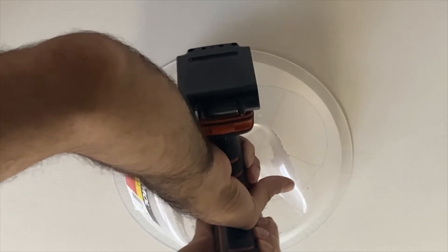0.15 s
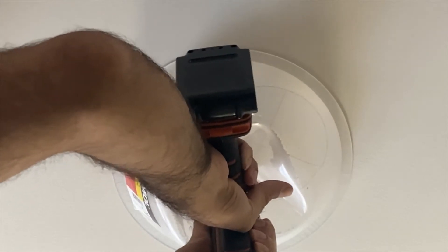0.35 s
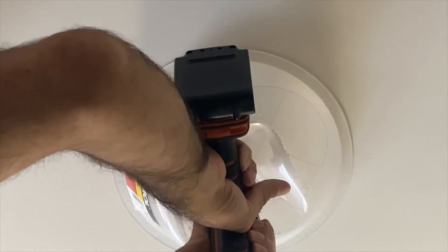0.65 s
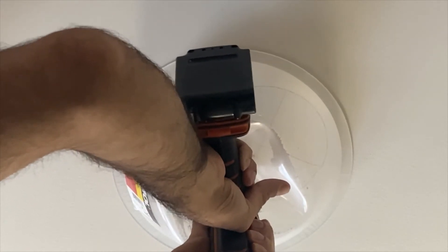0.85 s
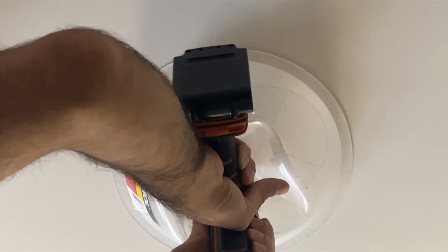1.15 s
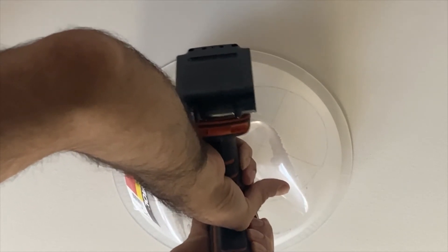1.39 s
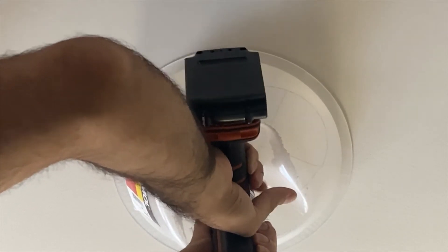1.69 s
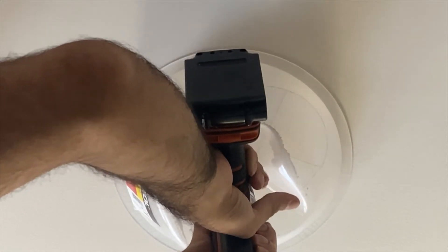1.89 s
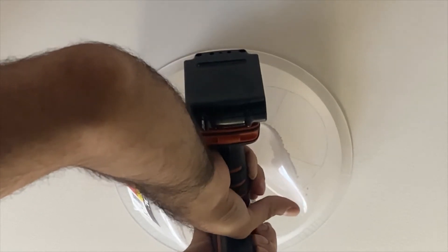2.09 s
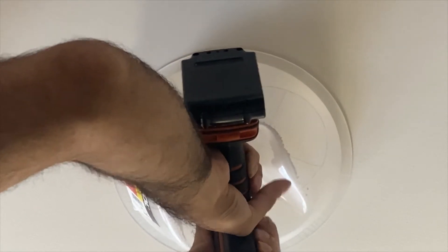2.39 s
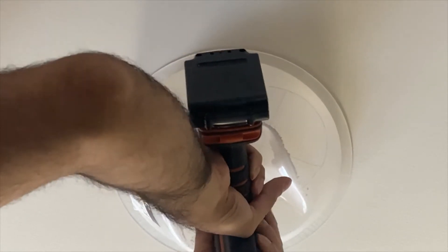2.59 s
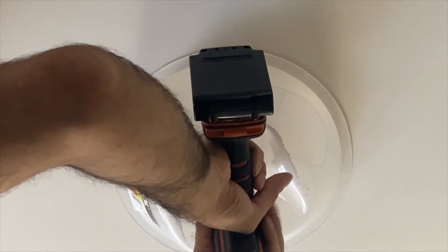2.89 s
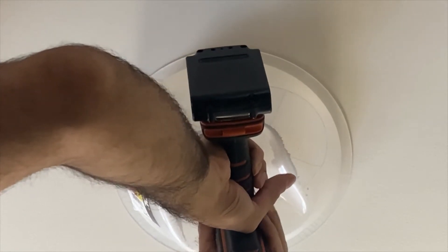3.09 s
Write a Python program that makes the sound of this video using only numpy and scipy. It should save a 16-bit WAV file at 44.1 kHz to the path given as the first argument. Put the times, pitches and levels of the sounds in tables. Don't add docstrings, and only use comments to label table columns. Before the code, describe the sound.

Loud gritty hole-saw drilling in plasterboard, with gear whine and hollow plastic bowl resonance, cuts off suddenly; a short bare-room echo fades to quiet hum, then tiny nudges and a trigger clack, heard on a mono phone.

```python
import sys
import numpy as np
from scipy import signal
from scipy.io import wavfile
from scipy.ndimage import uniform_filter1d

SR = 44100
rng = np.random.default_rng(int(sys.argv[2]) if len(sys.argv) > 2 else 0)


def undo_db(level):
    steps = np.asarray(level, float) / 20
    return 10 ** steps


def inscribe(sig):
    pcm = np.round(np.clip(np.atleast_2d(sig).T, -1, 1) * 32767)
    wavfile.write(sys.argv[1], SR, pcm.astype(np.int16))


N = 143325


def drill():
    # t/s, shaft speed f/Hz, effort level/dB, imbalance level/dB
    run = [(0, 258, -28, 9), (0.058, 215.1, -31.5, 9), (0.122, 197.2, -29.5, 7), (0.168, 282, -26.5, 2),
           (0.229, 362, -26, 3), (.34, 362, -27.5, 2), (.41, 358.6, -27, -6), (0.499, 362.3, -26.5, 6),
           (.65, 365, -26, 2), (.82, 361, -26, 4), (.93, 360, -25.5, 0), (1.051, 359, -25, 5),
           (1.22, 358, -26, 5), (1.29, 362, -26.5, -8), (1.39, 361, -25.5, 6), (1.5, 363, -26, 3),
           (1.57, 363, -26.5, 0)]
    # t/s, level/dB
    thump_swell = [
        (0, 4.5),
        (.4, -6),
        (.9, -10.5),
        (1.15, 4),
        (1.5, 5.5),
    ]
    stop_s, brake_s, brake_drop = 1.58, 0.05, 0.61
    shaft_wobble, room_db, tone_room_db = 0.004, -6, -16
    t = np.arange(N) / SR
    s, hz, db, imbalance_db = np.transpose(run)
    braking = np.clip((t - stop_s) / brake_s, 0, 1)
    speed = np.interp(t, s, hz) * (1 - brake_drop * braking)
    speed = speed * (1 + shaft_wobble * drift(size=1500))
    effort = undo_db(np.interp(t, s, db)) * (1 - braking) ** 2

    thump = undo_db(-28.5 + np.interp(t, *np.transpose(thump_swell))) * whistle(62.7, width_hz=20)
    tones = shaft_tones(speed, undo_db(np.interp(t, s, imbalance_db)))
    near = effort * saw_rasp()
    pitched = effort * (tones + thump) + bowl_booms() + singing()

    far = undo_db(room_db) * near + undo_db(tone_room_db) * pitched
    shift = 2 * np.pi * 1.7 * t
    return near + pitched + room(far * np.cos(shift)) + room(far * np.sin(shift))


def shaft_tones(speed, imbalance):
    # multiple of shaft speed, level/dB, fuzz width f/Hz
    shaft = [
        (1, -22, 18),
        (2.01, -20, 16),
        (5.02, -27, 40),
        (7.53, -24, 40),
        (8.55, -24, 40),
        (9.6, -24, 40),
    ]
    # t/s, level/dB
    second = [(.2, -9), (.254, 8.5), (.3, -6), (.335, 14), (.4, -7), (.5, 2), (.58, 4.5), (.8, 3),
              (.86, -11), (.97, 3), (1.08, -6.5), (1.15, -10.5), (1.27, 0.5), (1.4, -16), (1.47, 8.5),
              (1.55, 9)]
    t = np.arange(N) / SR
    loaded = np.clip((speed - 190) / 30, 0.1, 1)
    gains = [imbalance, loaded * undo_db(np.interp(t, *np.transpose(second)))]
    gains += [loaded] * (len(shaft) - 2)
    out = np.zeros(N)
    for (order, db, width_hz), gain in zip(shaft, gains):
        patchy = undo_db(db + drift(size=1500))
        out += patchy * gain * tone(order * speed, width_hz, fuzz_db=-10)
    return out


def saw_rasp():
    # f/Hz, width f/Hz, level/dB
    body_modes = [(184.3, 51, -24), (687, 330, -24.5), (956, 200, -27), (1327, 93, -24.5), (1797, 840, -13),
                  (2210, 250, -23.5), (3033, 1600, -8.5), (5210, 980, -19.5), (6285, 940, -17.5),
                  (10430, 1300, -23)]
    # f/Hz, level/dB per Hz
    rasp_spectrum = [(53, -48), (90, -18), (438, -1), (606, -15), (721, -5), (1160, -2.5), (3150, -2),
                     (10400, -6.5), (16000, -14.5)]
    grit_per_s, grit_spread_db = 25000, 1.2
    flicker_db, cup_sway_db, cup_turns_hz = -0.36, 0.5, 10.1
    t = np.arange(N) / SR
    cup = np.sin(2 * np.pi * (cup_turns_hz * t + 0.22))
    hit = rng.random(N) < grit_per_s / SR
    size = undo_db(grit_spread_db * np.minimum(rng.exponential(1, N), 3))
    grit = evened(hit * size * rng.standard_normal(N))
    flicker = evened(uniform_filter1d(rng.standard_normal(N), size=700))
    grit = grit * undo_db(flicker_db * flicker + cup_sway_db * cup)

    out = colour(grit, rasp_spectrum, patchy_db=0.5)
    for hz, width_hz, db in body_modes:
        out = out + undo_db(db) * evened(resonate(resonate(grit, hz, width_hz), hz, width_hz))
    return out


def bowl_booms():
    # t/s, f/Hz, level/dB
    booms = [(.27, 452, -32.5), (0.304, 463.7, -37.5), (.368, 425.8, -33.5), (.45, 438.6, -41.5),
             (.53, 465.6, -40.5), (.6, 466.6, -35), (0.711, 463, -36), (.788, 458.3, -34.5),
             (.838, 443.6, -41.5), (0.881, 432.3, -36), (.986, 436, -40), (1.039, 439, -38.5),
             (1.082, 445.7, -33), (1.177, 426, -38), (1.27, 434, -34.5), (1.39, 436, -41.5),
             (1.484, 437.6, -33.5), (1.565, 430, -33)]
    boom_s, rise_hz_per_s = 0.018, 400
    t = np.arange(N) / SR
    s, hz, _ = np.transpose(booms)
    nearest = np.abs(t[::64, None] - s).argmin(1).repeat(64)[:N]
    rise = rise_hz_per_s * np.clip(t - s[nearest], -0.05, 0.05)
    pitch = uniform_filter1d(hz[nearest] + rise, size=300)
    level = sum(undo_db(db) * swell(t, at, boom_s) for at, _, db in booms)
    return level * tone(pitch, width_hz=40, fuzz_db=-10)


def singing():
    # middle t/s, half length t/s, f/Hz, level/dB
    sings = [(.3, .06, 2760, -41), (.55, .07, 2752, -36), (.72, .04, 2745, -36), (.95, .05, 2715, -39),
             (1.03, .04, 2690, -36), (1.15, .06, 2685, -36), (1.42, .04, 2725, -36), (.85, .07, 3092, -36),
             (1.0, .05, 3090, -38), (1.21, .04, 3065, -35), (1.45, .05, 3085, -38), (.68, .04, 3505, -37),
             (.78, .04, 3470, -38), (.94, .04, 3450, -37), (1.42, .04, 3487, -37), (1.52, .05, 3510, -37),
             (.53, .04, 1825, -38), (.92, .04, 1680, -39), (1.31, .03, 2520, -38), (1.44, .05, 1703, -38),
             (.22, .04, 1696, -39), (.2, .05, 2190, -40)]
    out = np.zeros(N)
    fuzz = 1 + undo_db(-5) * whistle(0, width_hz=40)
    for k, (at, half_s, hz, db) in enumerate(sings):
        part = np.arange(-2.5 * half_s, 2.5 * half_s, 1 / SR)
        sine = np.sqrt(2) * np.sin(2 * np.pi * hz * part)
        rough = fuzz[k * 5000:][:len(part)]
        add(out, at + part[0], undo_db(db) * swell(part, 0, half_s) * sine * rough)
    return out


def taps():
    # t/s, peak level/dB, ring f/Hz, t60 t/s
    tap_events = [(2.154, -58, 2600, 0.056), (2.157, -57, 9000, 0.037), (2.385, -60, 3010, 0.22),
                  (2.4, -54, 1980, 0.11), (2.402, -59, 8860, 0.033), (2.42, -57.5, 1500, 0.3),
                  (2.484, -60, 8000, .05), (2.586, -58.5, 1380, .08), (2.871, -52, 2690, 0.026),
                  (2.872, -56, 1850, 0.23), (2.9235, -33, 3030, 0.027), (2.9256, -25, 2820, 0.011),
                  (2.9291, -24.5, 2720, 0.017), (2.9315, -30, 1900, 0.017), (2.9345, -35, 1660, 0.065),
                  (2.9415, -38, 1555, 0.061), (2.9485, -39, 3030, 0.067), (2.953, -37, 1560, 0.12),
                  (2.96, -53, 2400, 0.065), (2.969, -48, 1500, 0.13), (2.99, -49, 3470, 0.072),
                  (3.061, -49, 2380, 0.11), (3.068, -60, 6900, 0.054), (3.154, -60, 2930, .1)]
    # f/Hz, level/dB, t60 t/s
    knock_modes = [(680, -6, .025), (950, -3, .025), (1300, -5, .02), (1650, -2, .025), (2330, -2, .02),
                   (2800, 6, .012), (3150, 0, .01), (3600, -8, .01)]
    crack_db, ring_db, knock_db, room_db = -14, -4.5, 7, -11
    crack_t60_s, detune = 0.036, 0.038
    out, t = np.zeros(N), np.arange(6000) / SR
    crack_band = signal.butter(2, [3800, 12800], "band", fs=SR)
    for s, db, hz, t60 in tap_events:
        noise = rng.standard_normal(len(t))
        modes = np.zeros(len(t))
        for (f, mode_db, mode_t60), chance in zip(knock_modes, noise[::-1]):
            mode_hz = f * (1 + detune * chance)
            modes += undo_db(mode_db - 60 * t / mode_t60) * np.sin(2 * np.pi * mode_hz * t)
        knock = undo_db(knock_db) * modes / abs(modes).max() * np.minimum(t / 0.00055, 1)
        fade = undo_db(-60 * t / t60) * np.minimum(t / 0.0016, 1)
        width_hz = 0.9 * hz
        ring = undo_db(ring_db) * evened(resonate(resonate(noise, hz, width_hz), hz, width_hz))
        crack = undo_db(crack_db - 60 * t / crack_t60_s) * signal.lfilter(*crack_band, noise)
        add(out, s, undo_db(db) * (fade * ring + crack + knock))
    return out + undo_db(room_db) * room(out)


def room(x):
    # f/Hz, t60 t/s
    decay = [(150, 0.66), (500, 0.68), (2000, 0.38), (5000, 0.38), (12000, 0.21), (15500, 0.071)]
    echoes = np.zeros(SR)
    at = np.arange(200, SR - 20, 20)
    echoes[at + rng.integers(0, 20, len(at))] = rng.choice([-1., 1.], len(at))
    hz, t, z = signal.stft(echoes, SR, nperseg=256)
    tail = signal.istft(z * undo_db(-60 * t / read(decay, hz)[:, None]), SR, nperseg=256)[1]
    before = x[SR // 4:0:-1]
    wet = signal.fftconvolve(np.append(before, x), tail / np.linalg.norm(tail))
    return wet[len(before):][:N]


def house():
    # f/Hz, level/dB
    hum_lines = [(59.2, -59.5), (118.4, -64), (204.6, -63.5), (236.9, -65.5), (360.7, -71.5),
                 (409.1, -69.5), (629.8, -73), (872.1, -76), (942.1, -80.5), (1319, -79), (1873, -76)]
    # f/Hz, level/dB per Hz
    air_spectrum = [(18, -26), (30, -1.5), (219, -7.5), (284, -11), (410, -13.5), (1170, -23.5),
                    (1870, -25), (11600, -45), (15500, -59.5)]
    out = undo_db(-56.5) * colour(rng.standard_normal(N), air_spectrum, patchy_db=1.5)
    for hz, db in hum_lines:
        wavering = hz * (1 + 0.002 * drift(size=3000))
        out = out + undo_db(db - 2) * tone(wavering, width_hz=5 + 0.012 * hz, fuzz_db=-2)
    return out


def evened(x):
    return x / np.sqrt(np.mean(x ** 2) + 1e-20)


def read(points, hz):
    f, value = np.transpose(points)
    return np.interp(np.log(hz + 1), np.log(f + 1), value)


def add(mix, s, sound):
    part = mix[round(s * SR):][:len(sound)]
    part += sound[:len(part)]


def drift(size):
    return evened(uniform_filter1d(uniform_filter1d(rng.standard_normal(N), size=size), size=size))


def swell(t, s, half_s):
    return np.exp(-((t - s) / half_s) ** 2)


def resonate(x, hz, width_hz):
    turn = np.exp(2j * np.pi * np.cumsum(hz * np.ones(len(x))) / SR)
    r = np.exp(-np.pi * width_hz / SR)
    return 2 * (turn * signal.lfilter([1 - r], [1, -r], x / turn)).real


def whistle(hz, width_hz):
    r = np.exp(-np.pi * width_hz / SR)
    slow = signal.lfilter([1], np.convolve([1, -r], [1, -r]), rng.standard_normal((2, N)))
    angle = 2 * np.pi * np.cumsum(hz * np.ones(N)) / SR
    return evened(slow[0] * np.cos(angle) + slow[1] * np.sin(angle))


def tone(hz, width_hz, fuzz_db):
    sine = np.sqrt(2) * np.sin(2 * np.pi * np.cumsum(hz) / SR)
    return sine + undo_db(fuzz_db) * whistle(hz, width_hz)


def colour(x, points, patchy_db):
    hz, t, z = signal.stft(x, SR, nperseg=1024)
    patches = uniform_filter1d(rng.standard_normal(z.shape), size=10, axis=0)
    patches = evened(uniform_filter1d(patches, size=4, axis=1))
    gain = undo_db(read(points, hz)[:, None] + patchy_db * patches)
    return evened(signal.istft(z * gain, SR, nperseg=1024)[1][:len(x)])


def scene():
    mid = drill() + taps() + house()
    return np.array([mid, mid])


def treble_holes(x):
    hz, t, z = signal.stft(x, SR, nperseg=1024)
    chance = rng.random((len(hz) // 6 + 1, len(t) // 3 + 1))
    chance = chance.repeat(6, axis=0).repeat(3, axis=1)[:len(hz), :len(t)]
    share = np.interp(hz, [6250, 12500, 14200], [0, 0.015, 0.36])
    hole = chance < share[:, None]
    return signal.istft(z * undo_db(-45 * hole), SR, nperseg=1024)[1][:, :N]


def treble_gaps(x):
    # t/s, length t/s, above f/Hz
    gaps = [
        (2.357, .013, 3600),
        (2.445, .009, 4500),
        (2.913, .016, 3900),
        (2.9515, .012, 3900),
    ]
    for s, length_s, hz in gaps:
        at = np.arange(round((s - 0.05) * SR), round((s + 0.05) * SR))
        high = signal.firwin(255, hz, pass_zero=False, fs=SR)
        treble = signal.oaconvolve(x[:, at], high[None], "same")
        gate = np.clip((length_s / 2 - abs(at / SR - s)) / 0.0022 + 0.5, 0, 1)
        add(x.T, at[0] / SR, -0.997 * (treble * gate).T)
    return x


def starved_moments(x):
    starved = [.865, 1.078]
    # t/s, f/Hz, level/dB
    kept_lines = [(.865, 1687, -29.5), (0.864, 1824, -31), (.865, 3124, -32), (.865, 3500, -34),
                  (.865, 4830, -35), (0.863, 5310, -33), (.865, 6400, -35.5), (1.079, 360.5, -35.5),
                  (1.078, 445, -31), (1.078, 720, -36), (1.078, 970, -34.5), (1.078, 2160, -34),
                  (1.078, 2690, -31), (1.078, 2830, -30), (1.078, 4960, -36), (1.078, 10340, -34),
                  (1.078, 10570, -39), (2.915, 4790, -82), (2.958, 4820, -62), (2.958, 3750, -63)]
    length_s = 0.0427
    t = np.arange(N) / SR
    out = x
    for s in starved:
        out = out * np.abs(np.sin(np.pi * np.clip((t - s) / length_s, -0.5, 0.5))) ** 1.3
    part = np.arange(0, length_s, 1 / SR)
    window = np.sin(np.pi * part / length_s)
    for (s, hz, db), turn in zip(kept_lines, rng.random(len(kept_lines))):
        line = undo_db(db) * np.sqrt(2) * window * np.sin(2 * np.pi * (hz * part + turn))
        add(out.T, s - length_s / 2, line[:, None])
    return out


def channel_splits(x):
    # t/s, centre f/Hz, width f/Hz, level/dB
    splits = [
        (0.401, 7000, 1550, -45),
        (0.494, 8400, 1590, -42),
        (3.118, 5000, 1600, -82),
    ]
    length_s = 0.046
    window = np.sin(np.pi * np.arange(0, length_s, 1 / SR) / length_s)
    for s, hz, width_hz, db in splits:
        edges = [hz - width_hz / 2, hz + width_hz / 2]
        band = signal.butter(6, edges, "band", fs=SR, output="sos")
        noise = evened(signal.sosfilt(band, rng.standard_normal(4000)))[:len(window)]
        add(x.T, s - length_s / 2, (undo_db(db) * window * noise)[:, None] * [1, -1])
    return x


def top_cut(x):
    return signal.sosfilt(signal.butter(12, 16320, fs=SR, output="sos"), x)


def record(dry):
    low_pass = signal.firwin(511, 15680, window=("kaiser", 9), fs=SR)
    x = signal.oaconvolve(dry, low_pass[None], "same")
    x = signal.sosfilt(signal.butter(2, 32, "high", fs=SR, output="sos"), x)
    x = treble_gaps(treble_holes(x))
    x = channel_splits(starved_moments(x))
    return top_cut(x)


dry = scene()
out = record(dry)
inscribe(out)
```